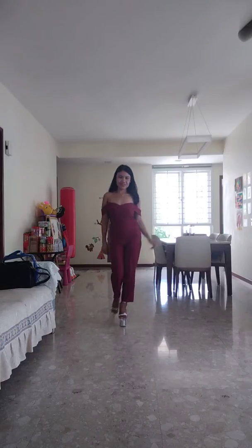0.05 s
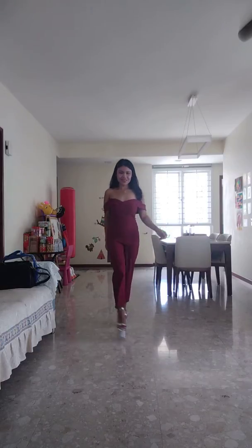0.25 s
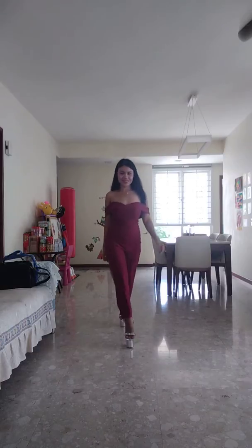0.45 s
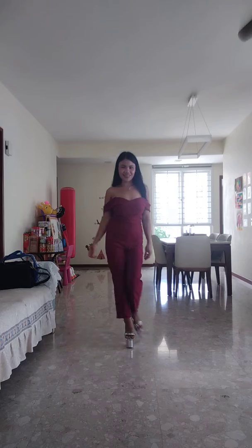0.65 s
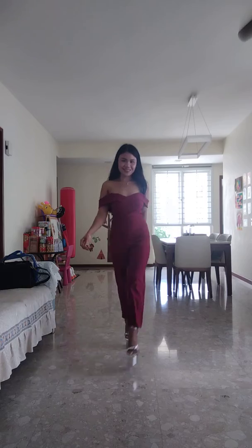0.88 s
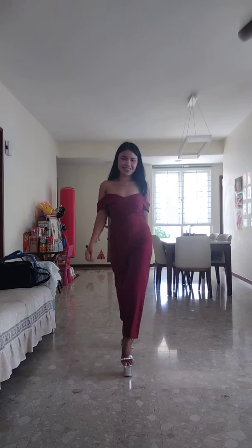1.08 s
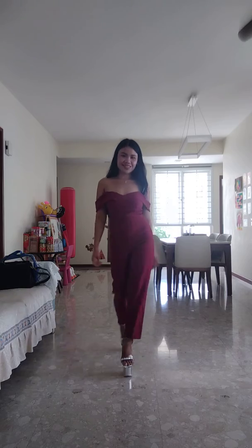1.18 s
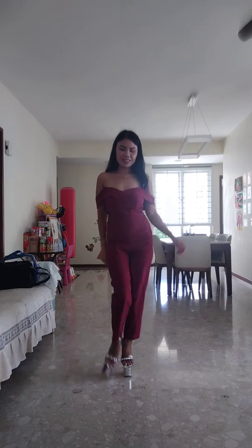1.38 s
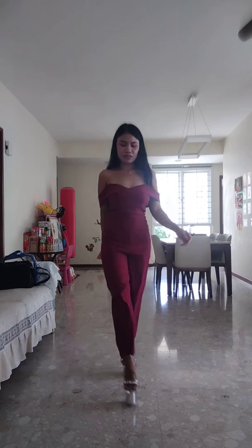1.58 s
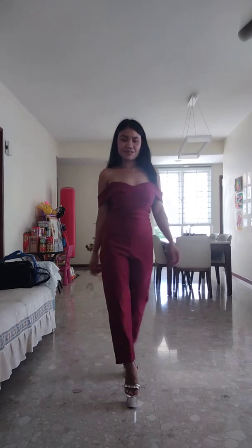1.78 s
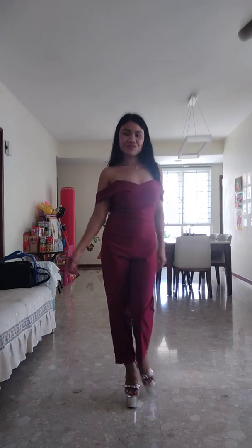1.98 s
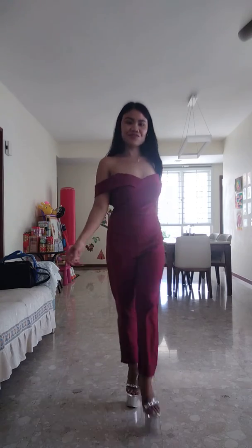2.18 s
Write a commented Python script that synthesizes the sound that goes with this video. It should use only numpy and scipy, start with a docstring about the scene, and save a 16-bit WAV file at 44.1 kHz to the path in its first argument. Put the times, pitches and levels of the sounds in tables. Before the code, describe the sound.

High heels take three slow steps towards the microphone on a stone floor. A lighter tap at 0.2 seconds leads into the first clack at 0.4; the others land at about 1.0 and 1.65 seconds. Each is a quick cluster of heel and sole contacts with tiny gritty ticks, a faint low boom and a short room echo. Trouser legs swish softly between steps over quiet room noise and hum.

```python
"""A bare living room with a stone floor: a woman in platform high heels takes three slow steps towards a phone.
In each step the heel strikes, then the sole slaps down in a few quick contacts, with ticks of grit.
Walls and ceiling echo the blows, and her weight sets off a low boom in the room.
Trouser legs swish between steps over a faint hum, room noise and the fading echo of an earlier step."""
import sys
import numpy as np
from scipy import signal
from scipy.fft import rfft, irfft
from scipy.io import wavfile

SR = 44100
rng = np.random.default_rng(int(sys.argv[2]) if len(sys.argv) > 2 else 0)


def dump_mix(stems):
    """Bounce the given channels to the path in sys.argv[1] as a 16-bit WAV at rate SR."""
    frames = np.atleast_2d(stems).T  # one column per channel
    limited = np.clip(frames, -1, 1)  # hard clip at full scale
    pcm = np.round(limited * 32767).astype(np.int16)
    wavfile.write(sys.argv[1], SR, pcm)


N = 99225


def gain(db):
    """Turn decibels into a number to multiply by."""
    return 10 ** (np.asarray(db) / 20)


def unit(x):
    """Scale a sound so that its energy is 1."""
    return x / np.sqrt(np.sum(x ** 2))


def fade(t, t60):
    """Die away by 60 dB every t60 seconds."""
    return np.exp(-np.log(1000) * t / t60)


def ring(t, hz, t60):
    """One fading tone, as from something struck."""
    return unit(np.sin(2 * np.pi * hz * t) * fade(t, t60))


def tone_curve(colour, size):
    """Join a table's (f/Hz, level/dB) points into a gain for every frequency."""
    hz = np.maximum(np.fft.rfftfreq(size, 1 / SR), 1)
    point_hz, point_db = np.array(colour, float).T
    return gain(np.interp(np.log(hz), np.log(point_hz), point_db))


def noise(colour):
    """Steady noise with the given colour, meaning its balance of low and high."""
    x = irfft(rfft(rng.standard_normal(N)) * tone_curve(colour, N), N)
    return x / x.std()


def click(colour, size=512):
    """A sharp click with the given colour."""
    cepstrum = irfft(np.log(tone_curve(colour, size)))
    # folding this onto its first half packs the energy at the start of the click
    cepstrum[1:size // 2] *= 2
    cepstrum[size // 2 + 1:] = 0
    return unit(irfft(np.exp(rfft(cepstrum))))


def add(out, start_s, x):
    """Mix a sound in at its start time."""
    i = int(start_s * SR)
    out[i:i + len(x)] += x[:N - i]


# colour of the room noise (f/Hz, relative level/dB)
AIR_COLOUR = [(20, -2), (45, 3.5), (70, 2.5), (100, 3), (170, -2), (300, -4.5), (500, -3), (1000, -2.5),
              (1600, -6), (2500, -17.5), (4300, -22), (6000, -23.5), (8300, -27.5), (12000, -25),
              (16000, -23.5)]
def room_noise(level_db=-57):
    """The quiet, low rush of the room."""
    return gain(level_db) * noise(AIR_COLOUR)


# colour of the lingering echo (f/Hz, relative level/dB)
LINGER_COLOUR = [(60, -19), (300, 1), (1000, -1.5), (1800, -5), (4000, -20), (16000, -33)]
def lingering_echo(t, start_db=-54.5):
    """The echo of an earlier step dies away."""
    return gain(start_db) * fade(t, t60=1.5) * noise(LINGER_COLOUR)


# how loud the hum is over time (t/s, level/dB)
HUM_LEVELS = [(0, -63.5), (.5, -71), (.85, -63), (1.25, -63), (1.4, -72.5), (2.25, -74)]
def hum(t, hz=133.5):
    """A faint low tone that dips, returns and sinks again."""
    level_db = np.interp(t, *np.array(HUM_LEVELS).T)
    return np.sqrt(2) * gain(level_db) * np.sin(2 * np.pi * hz * t)


# first bounces off walls and ceiling (delay t/s, level/dB against the direct sound)
BOUNCES = [(.0042, -7), (.0098, -19), (0.0124, -10), (0.0242, -13.5)]
# the wash of echo that follows, band by band (f/Hz, relative level/dB, fade t60/s)
WASH_BANDS = [(90, 7.5, 1), (215, -0.5, 0.64), (464, -1, 0.65), (915, 1.5, 0.73), (1940, 2.5, 0.76),
              (3500, 4.5, 0.72), (6030, 6.5, 0.79), (12800, 4, 0.56)]
def room_echo(t, wash_db=0, build_s=0.0098):
    """The room's answer to a click: the direct sound, a few bounces, then many blurred into a wash."""
    hz = np.fft.rfftfreq(N, 1 / SR)
    white = rfft(rng.standard_normal(N))
    centres = np.log([row[0] for row in WASH_BANDS])
    build_up = 1 - np.exp(-t / build_s)
    wash = np.zeros(N)
    for share, (_, db, t60) in zip(np.eye(len(WASH_BANDS)), WASH_BANDS):
        band = irfft(white * np.interp(np.log(hz + 1), centres, share), N)
        wash += gain(db) * band * unit(fade(t, t60) * build_up)
    response = gain(wash_db + 2) * wash
    response[0] += 1  # the direct sound
    for delay, db in BOUNCES:
        response[int(delay * SR)] += gain(db)
    return response


# swishes of the trouser legs (middle t/s, half length t/s, relative level/dB)
TROUSER_SWISHES = [(0.062, .07, -58.5), (0.248, .03, -55), (0.65, 0.098, -57.5), (1.297, .09, -59.5),
                   (1.398, .015, -55.5), (1.432, 0.023, -52), (1.913, 0.048, -56.5), (2.078, 0.039, -56),
                   (2.176, .02, -85)]
# colour of rubbing cloth (f/Hz, relative level/dB)
CLOTH_COLOUR = [(200, -18), (900, 2), (2500, 2.5), (3400, -1), (4400, -7), (6000, -1.5), (8200, -16.5),
                (12000, -11), (16000, -19.5)]
def trousers(t):
    """Cloth brushes past cloth in soft, grainy swishes that echo in the room."""
    power = sum(gain(db) ** 2 * np.exp(-((t - at) / half) ** 2) for at, half, db in TROUSER_SWISHES)
    grain_db = 3.4 * rng.standard_normal(N // 128)  # a new level about every 3 ms
    grain = np.interp(t, np.linspace(0, t[-1], len(grain_db)), gain(grain_db))
    swish = noise(CLOTH_COLOUR) * grain * np.sqrt(power)
    echo = signal.fftconvolve(swish, unit(room_echo(t)))[:N]
    return gain(-7.5) * (swish + gain(1.5) * echo)


def platform_knock(t, hz, band_hz=(188, 2700)):
    """The thick platform gives a short, hollow knock."""
    band = signal.butter(3, band_hz, "band", fs=SR, output="sos")
    return unit(signal.sosfilt(band, ring(t, hz, t60=0.017)))


# tones of the hard shoe (f/Hz at pitch ratio 1, relative level/dB, fade t60/s)
SHOE_TONES = [(731, -2, 0.0087), (1198, -8, 0.022), (1318, -6, 0.048), (1687, 0.5, 0.015),
              (2353, -2.5, 0.035), (3080, -9.5, 0.004), (3560, -6.5, 0.023), (5370, -7, 0.0017)]
def shoe_clack(t, pitch_ratio, cutoff_hz):
    """The hard shoe rings briefly; a soft landing has a lower cut-off and sounds duller."""
    tones = sum((-1) ** k * gain(db) * ring(t, hz * pitch_ratio, t60)
                for k, (hz, db, t60) in enumerate(SHOE_TONES))
    return signal.sosfilt(signal.butter(3, cutoff_hz, fs=SR, output="sos"), unit(tones))


# colour of a tick of grit (f/Hz, relative level/dB)
GRIT_COLOUR = [(1000, 1), (3000, 10.5), (4400, -3), (6000, 3.5), (8500, -6), (11500, -0.5), (14000, -3),
               (16000, -4.5)]
def grit_tick(t):
    """Grit crunches under the shoe in a tiny burst of noise."""
    burst = rng.standard_normal(len(t)) * fade(t, t60=0.0074)
    return unit(np.convolve(burst, click(GRIT_COLOUR))[:len(t)])


# tones the room rings at (f/Hz, relative level/dB, fade t60/s)
ROOM_TONES = [(208.7, -14, 0.72), (418.4, -10, 0.4), (508.3, -7, 0.54), (557, -15, 0.3), (635.4, -2, 0.56),
              (828, -8, 0.37), (895, -11, 0.67), (1107, -1, 1), (1360, -21, .55), (1633, -9, 0.57),
              (1770, -7, .5)]
def standing_waves(t, blows):
    """Sound going back and forth between the walls rings on after each blow."""
    tones = sum(gain(db) * ring(t, hz, t60) for hz, db, t60 in ROOM_TONES)
    return gain(-19.5) * signal.fftconvolve(blows, tones)[:N]


# each touch of shoe on floor, with relative levels (t/s, knock level/dB, knock f/Hz, clack level/dB,
# clack cut-off f/Hz, shoe pitch ratio, grit level/dB, echo wash level/dB)
FLOOR_CONTACTS = [ (0.2087, -26, 506, -17, 5000, 1.57, -23, -8),
                  (0.214, -10, 430, -4, 1480, 1.16, -23, 1.5),
                  (.3850, -0.5, 349, -21, 1200, 0.64, -24, -2.5),
                  (0.3934, -3, 444, -7.5, 2790, 0.96, -13.5, -1.5),
                  (.4120, -23, 516, -15, 2400, 0.65, -35, 10), (.4190, -9, 444, -7.5, 5540, 1, -13.5, 2),
                  (.4222, -1, 556, -4, 3550, 1.04, -20, -2.5),
                  (0.4297, -0.5, 776, 3, 2360, 0.958, -6.5, -4),
                  (.4320, -1.5, 663, -11, 3580, 0.79, -8, -2.5),
                  (.4385, -5.5, 476, -7.5, 3050, 1.2, -16, 2),
                  (1.0012, -3.5, 376, -6.5, 2100, .93, -30, 2.5),
                  (1.0085, -3, 626, -1.5, 1200, 0.83, -28, 0.5),
                  (1.0108, -31, 646, 2.5, 1700, 1.108, -21, -1.5),
                  (1.0252, -10.5, 625, -13, 2120, 0.896, -11, 0.5),
                  (1.549, -20, 417, -18.5, 1520, 0.92, -49, 3.5),
                  (1.6332, -1, 454, -3, 2800, 0.9, -15.5, 2.5), (1.6368, -8, 415, -6, 1790, 0.77, -38, 2.5),
                  (1.6425, -10, 467, -5, 3500, 0.99, -19, -4),
                  (1.6614, -16, 460, -9.5, 5540, 1.06, -9.5, 1.5),
                  (1.6710, 1.5, 470, -8, 3430, 0.8, -5, -3),
                  (1.6900, -2.5, 434, -11, 4050, 0.87, -11, -0.5)]
def footsteps(t):
    """Each contact is a knock, a clack and a tick together; it echoes and sets the room ringing."""
    blows, with_echo = np.zeros(N), np.zeros(N)
    blow_t = t[:4096]
    for start, knock_db, knock_hz, clack_db, cutoff_hz, pitch_ratio, grit_db, wash_db in FLOOR_CONTACTS:
        knock = gain(knock_db) * platform_knock(blow_t, knock_hz)
        clack = gain(clack_db + 3) * shoe_clack(blow_t, pitch_ratio, cutoff_hz)
        grit = gain(grit_db - 4.5) * grit_tick(blow_t)
        blow = gain(-15) * (grit - knock - clack)
        add(blows, start, blow)
        add(with_echo, start, signal.fftconvolve(blow, room_echo(t, wash_db)))
    return with_echo + standing_waves(t, blows)


# one low boom for each step (t/s, peak level/dB)
STEP_BOOMS = [(0.384, -56), (1.001, -46), (1.639, -59.5)]
def booms(t, hz=131, rise_s=0.04):
    """The body's weight sets off the room's lowest tone, which swells and dies away."""
    out = np.zeros(N)
    swell = (1 - np.exp(-t / rise_s)) ** 2 * fade(t, t60=0.32)
    boom = swell / swell.max() * np.sin(2 * np.pi * hz * t)
    for start, db in STEP_BOOMS:
        add(out, start, gain(db) * boom)
    return out


def scene():
    """All the sounds meet at the phone's microphone, in one channel."""
    t = np.arange(N) / SR
    walking = footsteps(t) + booms(t) + trousers(t)
    background = room_noise() + lingering_echo(t) + hum(t)
    return (walking + background)[None]


def record(dry):
    """The phone cuts off the highest treble."""
    top_hz = 15750
    return signal.sosfilt(signal.ellip(12, .2, 70, top_hz, fs=SR, output="sos"), dry)


dry = scene()
out = record(dry)
dump_mix(out)
```